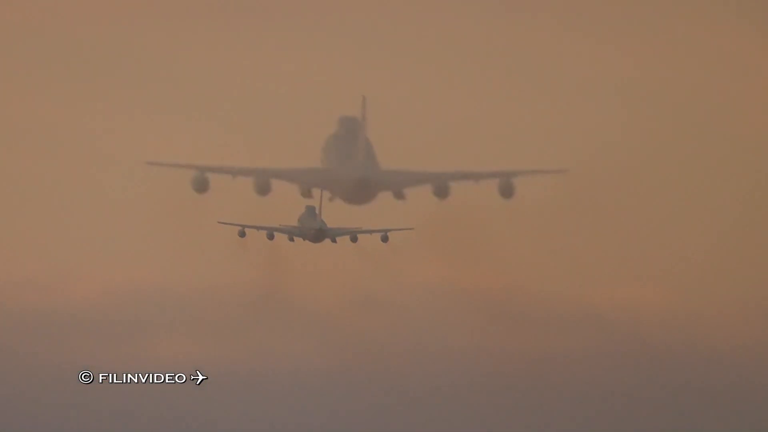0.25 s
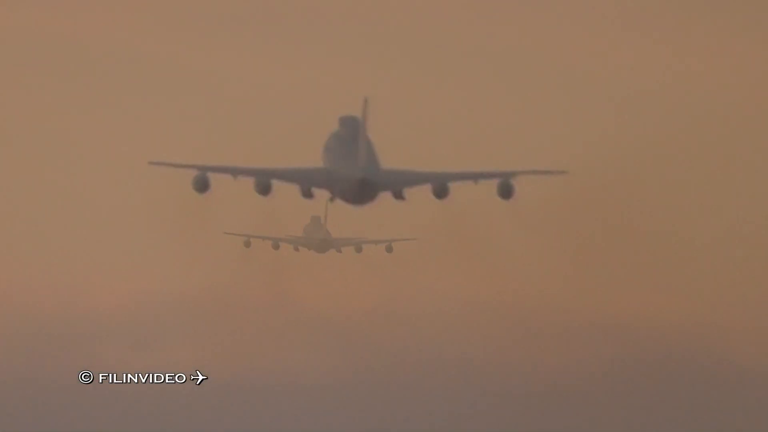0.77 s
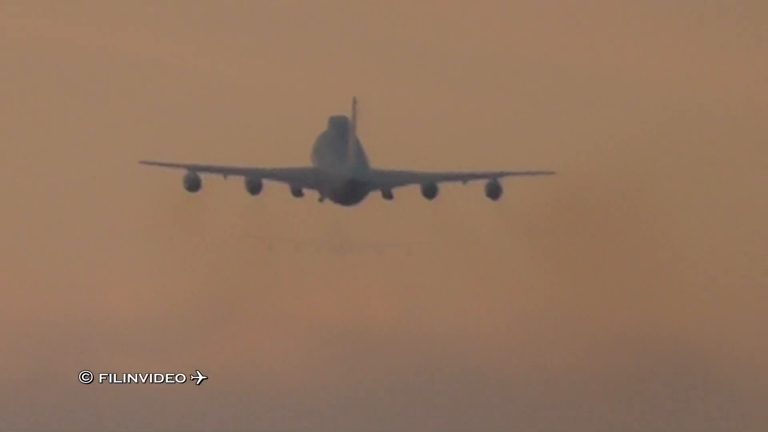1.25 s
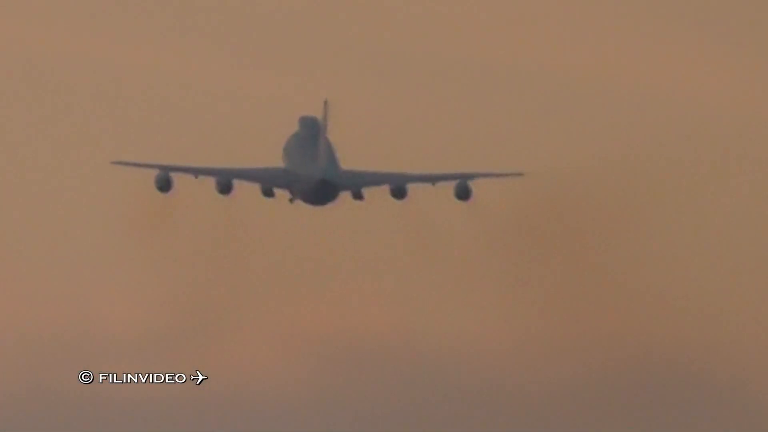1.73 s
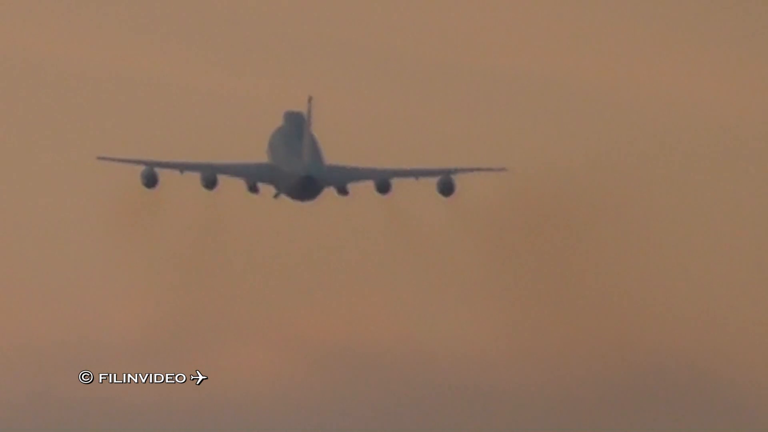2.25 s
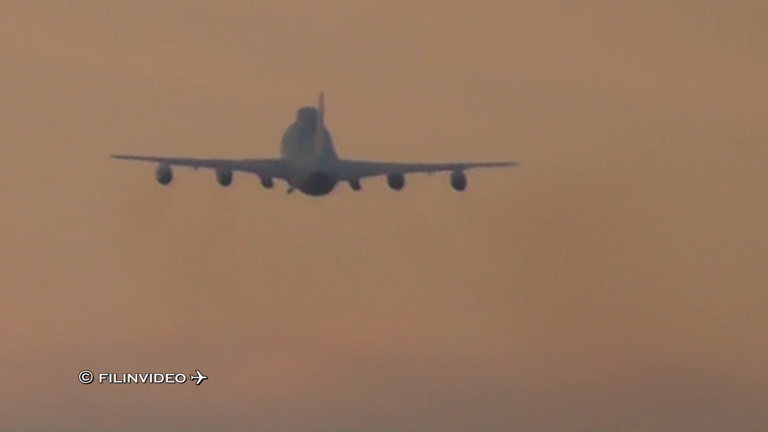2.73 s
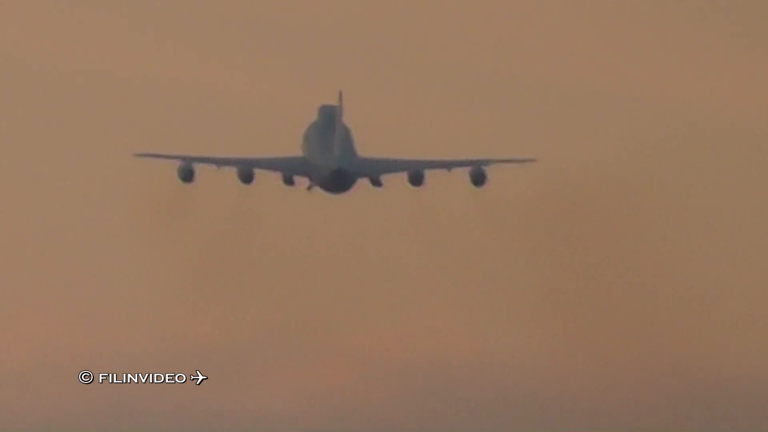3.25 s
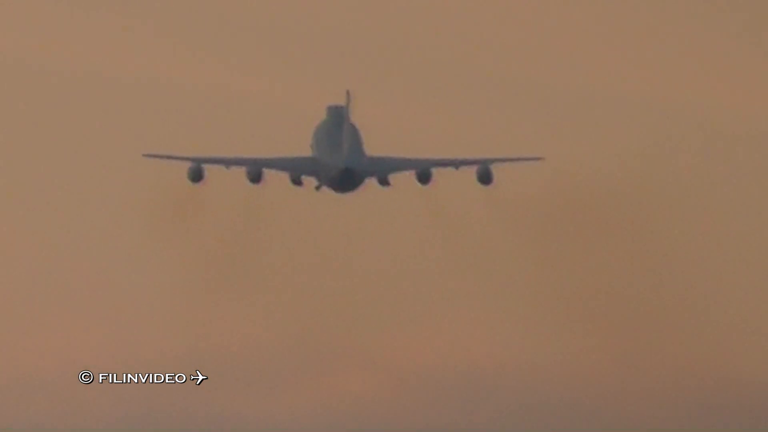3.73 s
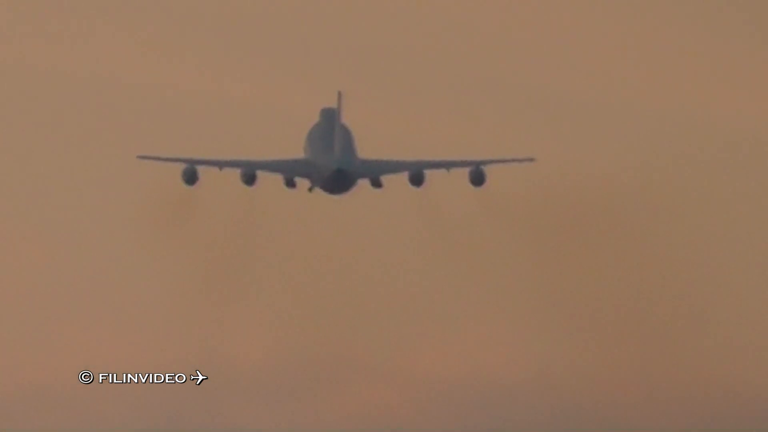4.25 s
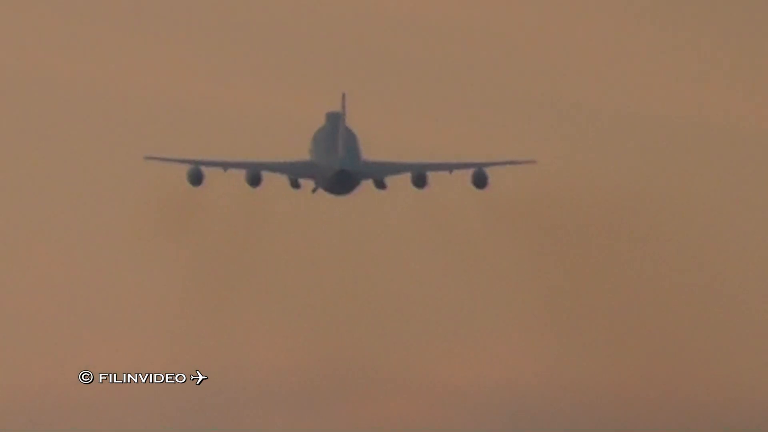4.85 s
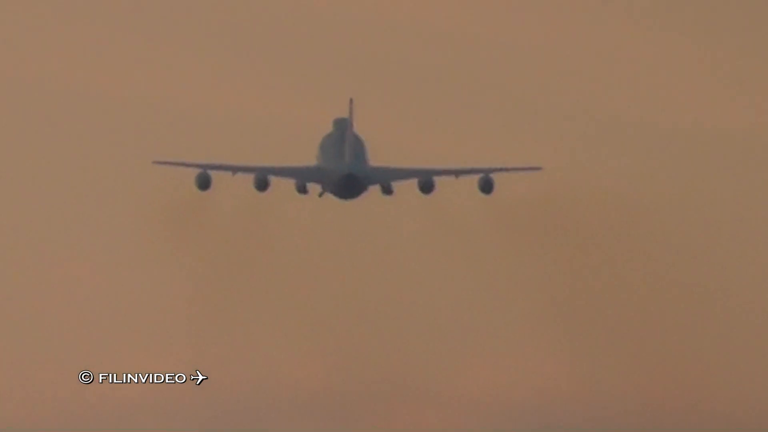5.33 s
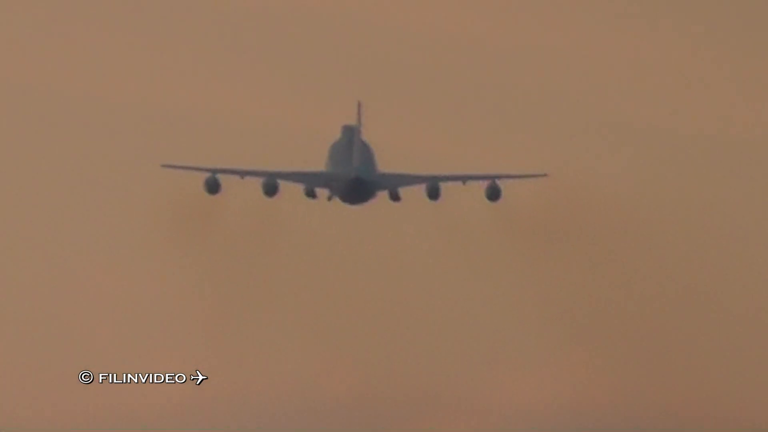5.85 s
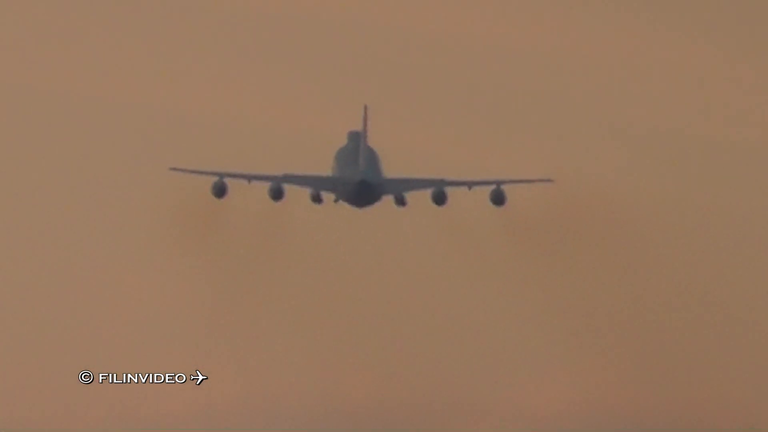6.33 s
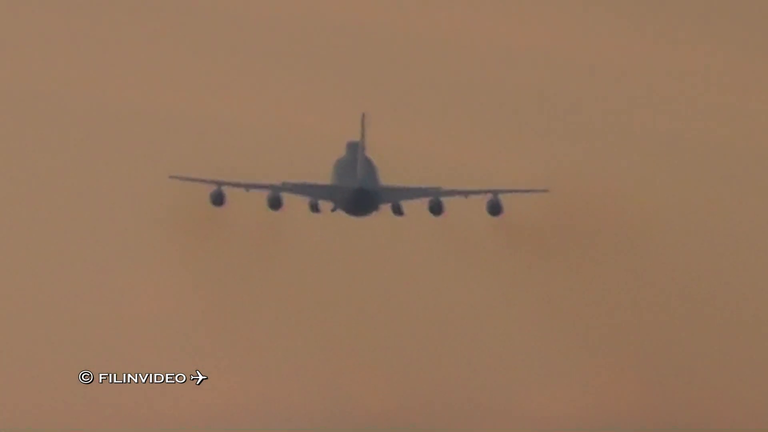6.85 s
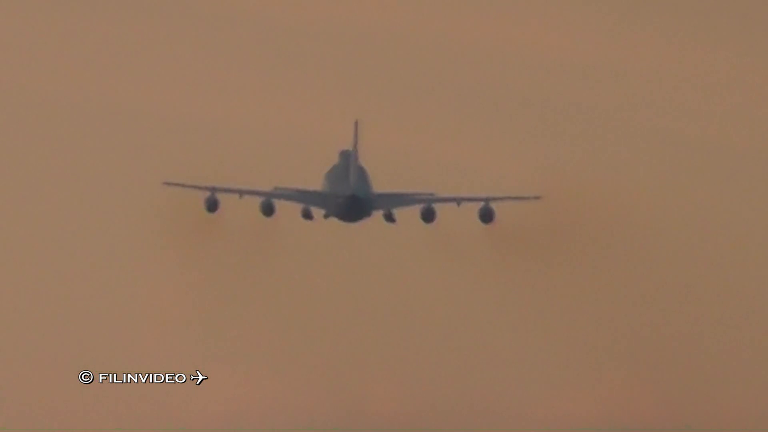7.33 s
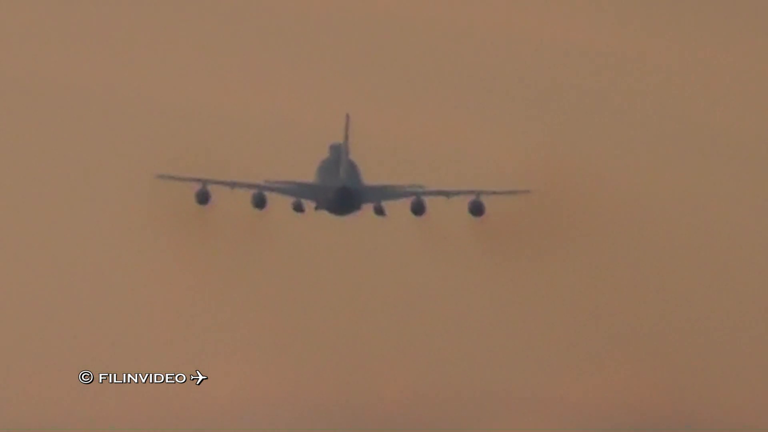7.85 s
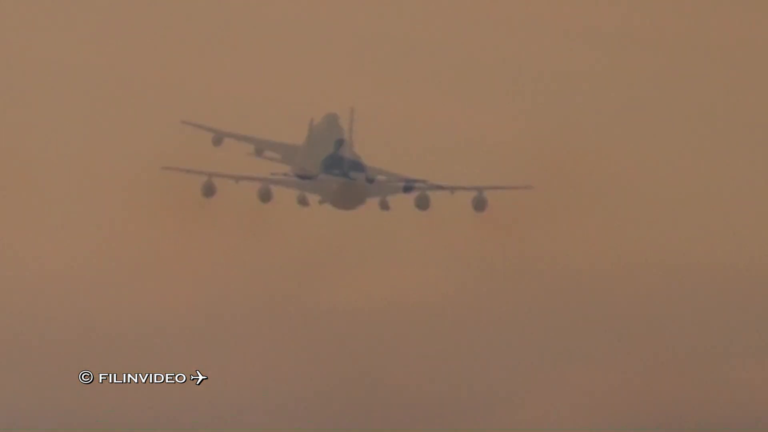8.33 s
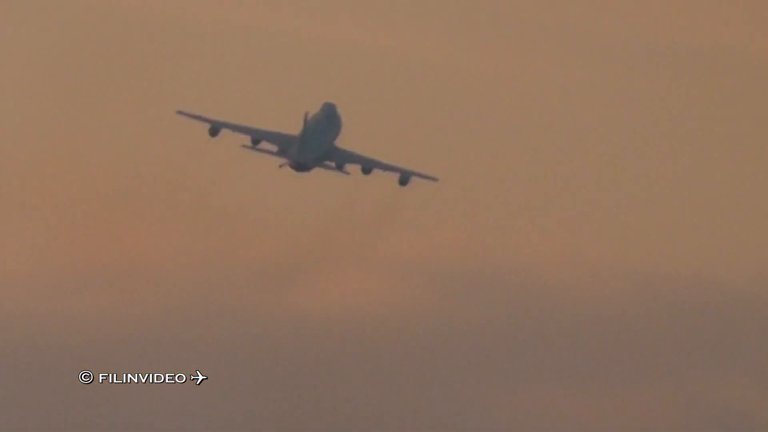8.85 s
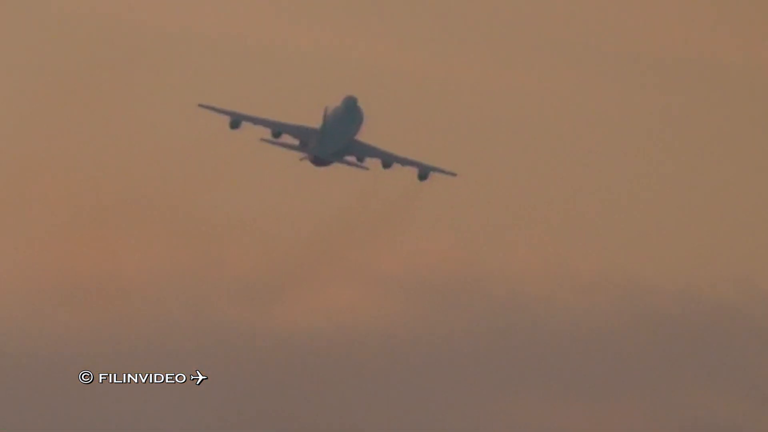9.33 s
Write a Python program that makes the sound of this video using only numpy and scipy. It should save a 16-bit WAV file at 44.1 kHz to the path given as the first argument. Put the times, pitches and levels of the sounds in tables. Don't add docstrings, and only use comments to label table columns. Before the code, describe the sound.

A departing jet's deep rumble swells and fades into the distance while wind gusts buffet the microphone and a small engine rattles steadily close by.

```python
import sys
import numpy as np
from scipy import signal
from scipy.fft import rfft, irfft, next_fast_len
from scipy.io import wavfile
from scipy.ndimage import uniform_filter1d

SR = 44100
rng = np.random.default_rng(int(sys.argv[2]) if len(sys.argv) > 2 else 0)


def store_wav(level_fs):
    pcm = np.round(np.clip(np.atleast_2d(level_fs), -1, 1) * 32767)
    wavfile.write(sys.argv[1], SR, pcm.T.astype(np.int16))


def rack_gain(trim_db):
    fader = np.asarray(trim_db, float)
    return 10 ** (fader / 20)


N = 422478


def rms_one(x):
    return x / np.sqrt(np.mean(x ** 2) + 1e-20)


def in_time(rows):
    start_s, *columns = np.transpose(rows)
    return [np.interp(np.arange(N) / SR, start_s, c) for c in columns]


def at_hz(rows, hz):
    table_hz, *columns = np.transpose(rows)
    return [np.interp(np.log(hz), np.log(table_hz), c) for c in columns]


def drift(rate_hz):
    r = np.exp(-80 * np.pi * rate_hz / SR)
    white = rng.standard_normal(N // 40 + 2002)
    slow = rms_one(signal.lfilter([1], [1, -2 * r, r * r], white)[2000:])
    return np.interp(np.arange(N) / 40, np.arange(len(slow)), slow)


def swells(rows, rest_db):
    t = np.arange(0, N + 64, 64) / SR
    power = sum(rack_gain(2 * db) * np.exp(-((t - s) / half) ** 2) for s, half, db in rows)
    return 10 * np.log10(np.interp(np.arange(N) / SR, t, power) + rack_gain(2 * rest_db))


def tone(hz, waver):
    pitch_hz = hz * (1 + waver * drift(2.475))
    return np.sqrt(2) * np.sin(2 * np.pi * np.cumsum(pitch_hz) / SR)


def resonance(x, hz, width_hz):
    r = np.exp(-np.pi * width_hz / SR)
    feed = np.array([1, 0, -1]) * (1 - r * r) / 2
    return signal.lfilter(feed, [1, -2 * r * np.cos(2 * np.pi * hz / SR), r * r], x)


def coloured(x, spectrum):
    size = next_fast_len(N)
    hz = np.maximum(np.arange(size // 2 + 1) * SR / size, 1)
    return rms_one(irfft(rfft(x, size) * rack_gain(at_hz(spectrum, hz)[0]), size)[..., :N])


def at_ports(pair, ports):
    size = next_fast_len(N)
    hz = np.maximum(np.arange(size // 2 + 1) * SR / size, 1)
    alike, lag, lean_db = at_hz(ports, hz)
    alike = np.clip(alike, 0, 1)
    first, twin = rfft(pair, size)
    right = alike * first * np.exp(-1j * lag) + np.sqrt(1 - alike ** 2) * twin
    both = np.array([first * rack_gain(lean_db / 2), right * rack_gain(-lean_db / 2)])
    return irfft(both, size)[:, :N]


def turbulence(spectrum, lumps_db, own_db, own_rate_hz):
    edges = np.geomspace(spectrum[0][0], spectrum[-1][0], num=7)
    white = rng.standard_normal((2, 2, N))
    lead = SR // 2
    out = 0
    for k, (low, high) in enumerate(zip(edges, edges[1:])):
        sos = signal.butter(2, [low, high], "band", fs=SR, output="sos")
        looped = np.tile(white[k % 2], 2)[:, N - lead:]
        band = signal.sosfilt(sos, looped)[:, lead:]
        out = out + band * rack_gain(lumps_db + own_db * drift(own_rate_hz))
    return coloured(out, spectrum)


# start_s [s], rumble_db [dB]
JET_LEVEL = [(0, -19), (.45, -19.5), (.8, -21.5), (1.2, -20.5), (1.6, -22), (2.1, -16), (2.8, -24),
             (3.1, -20.5), (3.8, -23), (4.1, -15.5), (4.6, -20.5), (5.0, -20), (6.3, -21), (7.2, -24.5),
             (7.4, -23.5), (7.75, -25.5), (8.3, -29), (9.58, -29.5)]
# band_hz [Hz], level_db [dB per Hz]
JET_RUMBLE = [(22, -40), (45, -15.5), (75, -9), (100, -1), (140, -1.5), (220, -5), (330, -11), (450, -23)]
# band_hz [Hz], level_db [dB per Hz]
JET_ROAR = [(230, -32), (350, -1.5), (500, 1), (700, -2.5), (1000, -20), (1500, -26), (2500, -30)]
# band_hz [Hz], likeness [0-1], right_lag_rad [rad], left_over_right_db [dB]
JET_STEREO = [(40, 0.8, 0, 4.5), (200, 0.91, -0.15, .5), (600, 0.77, -0.13, -3.5), (1300, 0, -0.063, 6)]


def jet():
    t = np.arange(N) / SR
    rumble_db = in_time(JET_LEVEL)[0]
    roar_db = -31.5 - 0.5 * t
    roar_db = roar_db + 6 * np.exp(-(t / 0.37) ** 2)
    roar_db = roar_db + 0.13 * (rumble_db - rumble_db.mean())
    swell = drift(3.9)
    rumble = rack_gain(rumble_db + 0.5) * turbulence(JET_RUMBLE, 1.2 * swell, own_db=1.0, own_rate_hz=6.1)
    roar = rack_gain(roar_db + 1.5) * turbulence(JET_ROAR, 0.73 * swell, own_db=1.3, own_rate_hz=6.0)
    return at_ports(rumble + roar, JET_STEREO)


# peak_s [s], half_length_s [s], peak_db [dB]
GUST_SWELLS = [(.12, 0.16, -22), (.3, .1, -23), (.55, 0.11, -22.5), (.82, 0.12, -18), (1.33, 0.057, -24),
               (1.7, 0.056, -26.5), (1.88, 0.086, -22), (2.05, .08, -26.5), (2.22, .04, -22),
               (2.41, 0.039, -17.5), (2.55, 0.06, -17.5), (2.72, .04, -23), (2.86, .07, -17),
               (3.11, 0.14, -18.5), (3.58, 0.28, -18), (3.83, 0.084, -18.5), (3.97, .04, -15.5),
               (4.14, 0.061, -13.5), (4.39, 0.12, -16), (4.68, 0.19, -24.5), (5.26, 0.029, -24.5),
               (5.45, .1, -22), (5.7, 0.15, -24), (5.932, 0.027, -9.5), (6.27, 0.17, -23.5),
               (6.76, 0.031, -37.5), (6.92, 0.048, -34.5), (7.38, 0.035, -26.5), (7.5, 0.032, -25),
               (8.0, 0.12, -39.5)]
# band_hz [Hz], level_db [dB per Hz]
BUFFET_SPECTRUM = [(22, -41.5), (45, -26.5), (85, -9), (170, 4.5), (260, -2.5), (350, -5.5), (520, -22)]
# band_hz [Hz], level_db [dB per Hz]
FLUTTER_SPECTRUM = [(280, -20), (420, -2), (700, -11.5), (1100, -13.5), (1600, -28), (2200, -39),
                    (3500, -67)]
# band_hz [Hz], likeness [0-1], right_lag_rad [rad], left_over_right_db [dB]
WIND_STEREO = [(40, .5, .2, -12.5), (130, 0.34, 0.69, 5), (235, 0.97, 0.7, -3), (362, 0.68, 2.38, -3.5),
               (540, 0.85, 2.87, -1), (1500, 0.94, 3.3, -3)]


def wind():
    calm_db = -30 - 3 * np.arange(N) / SR
    buffet_db = swells(GUST_SWELLS, calm_db)
    flutter_db = -28 + 1.33 * (buffet_db + 20.5)
    eddies = drift(19.4)
    spits_db = 3.5 * drift(60)
    buffet = turbulence(BUFFET_SPECTRUM, 1.6 * eddies, own_db=3.0, own_rate_hz=13.7)
    flutter = turbulence(FLUTTER_SPECTRUM, 2.0 * eddies + spits_db, own_db=1.0, own_rate_hz=19.0)
    return at_ports(rack_gain(buffet_db + 6.0) * buffet + rack_gain(flutter_db + 2.0) * flutter, WIND_STEREO)


# start_s [s], tick_peak_db [dB], rustle_db [dB]
HAND_TICKS = [
    (.044, -52, -71),
    (.163, -54, -69),
    (.598, -34.5, -36),
    (.643, -53, -67),
    (.742, -54, -70),
]


def handling():
    out = np.zeros((2, N))
    after = np.arange(int(0.049 * SR)) / SR
    for start_s, tick_db, rustle_db in HAND_TICKS:
        tick = rack_gain(tick_db) * np.exp(-after / 0.00079)
        rustle = rack_gain(rustle_db) * np.exp(-((after - .009) / .006) ** 2)
        shared = rng.standard_normal(len(after))
        grit = shared + .5 * rng.standard_normal((2, len(after)))
        start = int(start_s * SR)
        out[:, start:start + len(after)] += (tick + rustle) * grit
    return signal.sosfilt(signal.butter(2, [4500, 9500], "band", fs=SR, output="sos"), out)


GEAR_TONES = [830.5, 917, 937, 991, 789.5]
GEAR_SPELLS = {0: [(1.65, .3, -47), (3.1, .6, -42.5), (4.6, 0.62, -43.5), (6.3, 0.41, -43.5),
               (7.05, 0.16, -43.5), (8.2, 0.85, -47)], 1: [(1.2, 0.26, -44), (2.9, 0.54, -50),
               (4.8, 0.68, -45), (7.0, 0.7, -47), (9.0, .5, -51)], 2: [(1.4, .6, -40), (3.0, 0.69, -40.5),
               (4.4, .4, -40.5), (6.8, 0.39, -46.5), (7.7, 0.48, -46.5), (9.0, 0.3, -44)],
               3: [(1.1, 0.54, -48), (2.9, 0.34, -43), (4.35, .2, -53), (6.9, 0.82, -54)],
               4: [(1.3, 0.5, -46), (3.2, 0.11, -46), (4.6, 0.37, -46)]}


def gears():
    song = 0
    for k, hz in enumerate(GEAR_TONES):
        level_db = swells(GEAR_SPELLS[k], rest_db=-56) + 1.8 * drift(3.9)
        song = song + rack_gain(level_db) * tone(hz, 0.000996)
    return song * rack_gain([[-.8], [.8]])


# start_s [s], level_db [dB]
ENGINE_LEVEL = [(0, -39), (.7, -37), (.85, -39.5), (1.3, -35), (2.3, -36), (3.3, -35.5), (3.52, -36.5),
                (3.88, -39), (4.12, -34), (4.5, -36), (5.9, -36.5), (6.75, -36.5), (7.3, -38), (7.9, -38.5),
                (8.4, -42.5), (8.6, -39.5), (9.0, -39.5), (9.58, -38.5)]
# start_s [s], ahead_cycles [firing cycles ahead of a steady beat]
GOVERNOR = [(0, .03), (1.0, -.13), (2.5, -.24), (3.9, -.19), (5.0, .07), (5.6, .15), (7.0, .17), (7.6, .08),
            (9.0, .16), (9.58, .15)]
# pitch_hz [Hz], width_hz [Hz], level_db [dB]
BLOCK_MODES = [(1596, 37, -6.5), (1669, 51, 3.5), (1828, 24, 4), (1923, 66, 1), (2072, 78, 0.5),
               (2408, 27, -6.5), (2750, 140, -10), (3099, 56, -2.5), (3296, 57, -4), (3570, 133, -8),
               (4113, 39, -4.5), (4404, 27, 0), (4650, 73, -15.5), (4820, 75, -11.5), (5380, 47, -18)]
# band_hz [Hz], level_db [dB per Hz]
HISS_SPECTRUM = [(500, -30), (800, -2), (1200, -6), (1550, -10.5), (1900, -17.5), (2300, -14.5),
                 (3200, -13), (4400, -13.5), (5200, -18.5), (7200, -22), (7800, -32), (8400, -26.5),
                 (10300, -40), (15500, -47)]
# band_hz [Hz], likeness [0-1], right_lag_rad [rad], left_over_right_db [dB]
ENGINE_STEREO = [(700, 0.2, -0.083, -4.5), (1500, 0.84, -0.25, 0.5), (2200, 0.74, -.3, -3.5),
                 (3200, 0.9, -0.13, -1.5), (4520, 1, -0.2, 0.5), (7000, 0.92, 0, -1.5),
                 (10000, 0.57, 0, -1.5), (15000, .1, 0, 1)]
# pitch_hz [Hz], level_db [dB re engine]
WHINE_TONES = [(811, -17), (969.5, -14), (1811, -19), (1913, -18), (2045, -21), (2950, -23), (3091, -19.5),
               (3580, -21.5), (4349, -20), (4892, -23), (5437, -28)]


def engine():
    t = np.arange(N) / SR
    firing_hz = 48.9
    cycles = firing_hz * t + in_time(GOVERNOR)[0] + 1.17 + .005 * drift(15.0)
    count = cycles.astype(int)
    since_s = cycles % 1 / firing_hz
    strength = rack_gain(1.2 * rng.standard_normal(count.max() + 1))[count]
    throb = rack_gain(1.94 * np.sin(2 * np.pi * 12.0 * t + 0.53 * drift(1.0)))

    burst = strength * throb * np.exp(-since_s / 0.0038) * (1 - np.exp(-since_s / 0.0014))
    blow = 13 * strength * (np.diff(count, prepend=count[0]) > 0)
    rattle = rng.standard_normal((2, N)) * (burst + 0.21) + blow * [[1], [0]]
    knock = 0
    for k, (hz, width_hz, db) in enumerate(BLOCK_MODES):
        knock = knock + (-1) ** k * rack_gain(db) * resonance(rattle, hz, width_hz)

    puff = strength * np.exp(-since_s / 0.012) * (1 - np.exp(-since_s / 0.0027))
    breath = (1 + 1.7 * puff) * throb ** 0.31 * rack_gain(0.58 * drift(15.0))
    hiss = coloured(rng.standard_normal((2, N)) * breath, HISS_SPECTRUM)

    whine = sum(rack_gain(db + 2.2 * drift(3.0)) * tone(hz, .0014) for hz, db in WHINE_TONES)
    body = at_ports(rack_gain(-3.0) * rms_one(knock) + rack_gain(-0.5) * hiss, ENGINE_STEREO)
    return rack_gain(in_time(ENGINE_LEVEL)[0]) * (body + whine * rack_gain([[-.7], [.7]]))


def scene():
    return jet() + wind() + handling() + gears() + engine()


def roll_off(x):
    return signal.sosfilt(signal.butter(12, 15770, fs=SR, output="sos"), x)


def record(dry):
    limit_db, share, window_s, recover_db_per_s = -12, 0.22, 0.015, 49
    power = uniform_filter1d(np.mean(dry ** 2, axis=0), int(window_s * SR))
    level_db = 10 * np.log10(power + 1e-12)
    ramp = recover_db_per_s * np.arange(N) / SR
    over_db = np.maximum.accumulate(np.maximum(level_db - limit_db, 0) + ramp) - ramp
    ducked = dry * rack_gain(-share * uniform_filter1d(over_db, size=400))
    rounded = 1.34 * np.tanh(ducked / 1.276)
    return roll_off(rounded)


dry = scene()
out = record(dry)
store_wav(out)
```